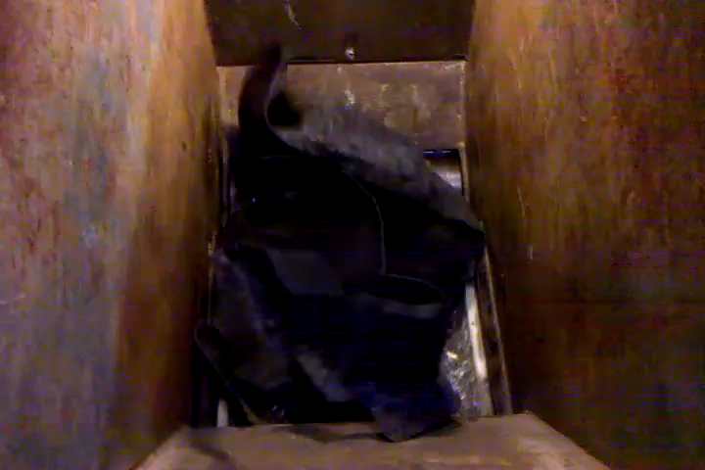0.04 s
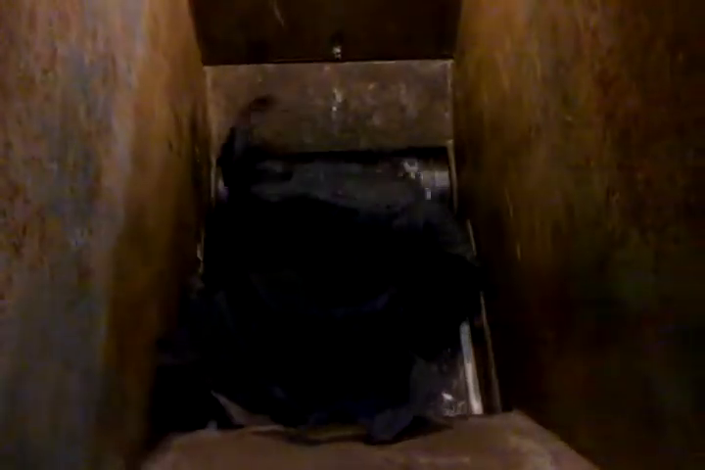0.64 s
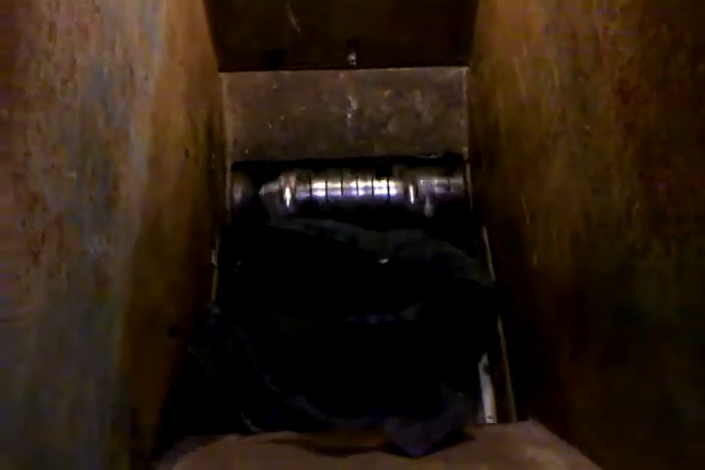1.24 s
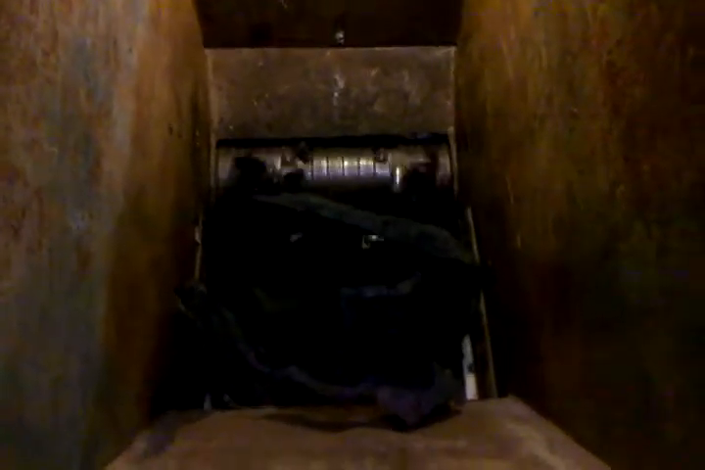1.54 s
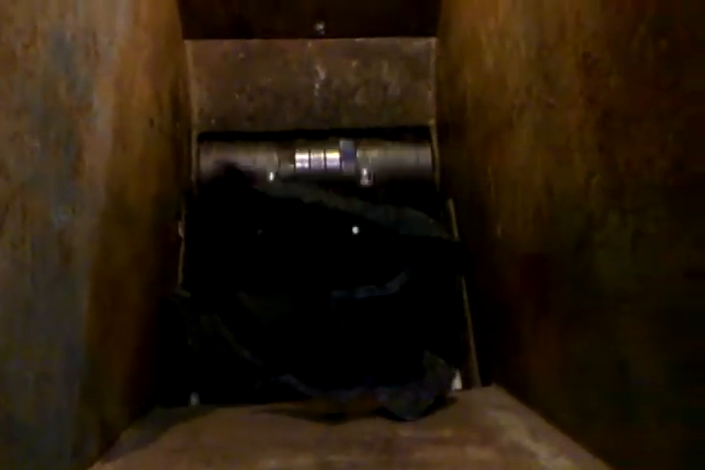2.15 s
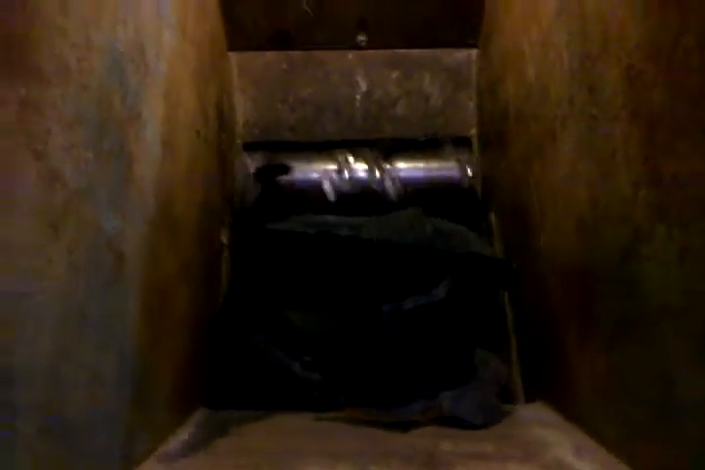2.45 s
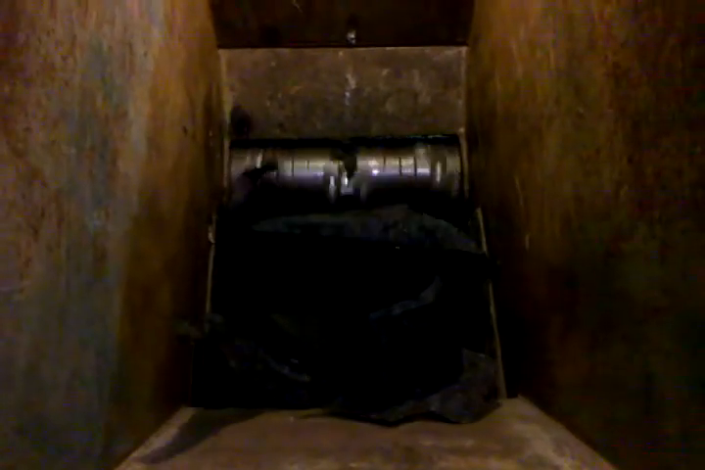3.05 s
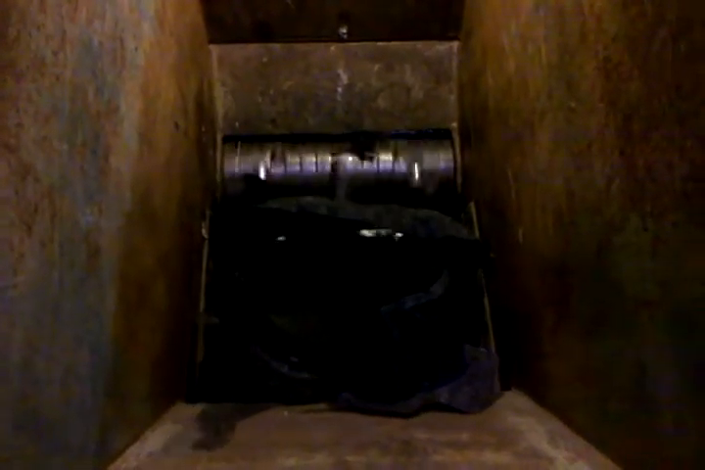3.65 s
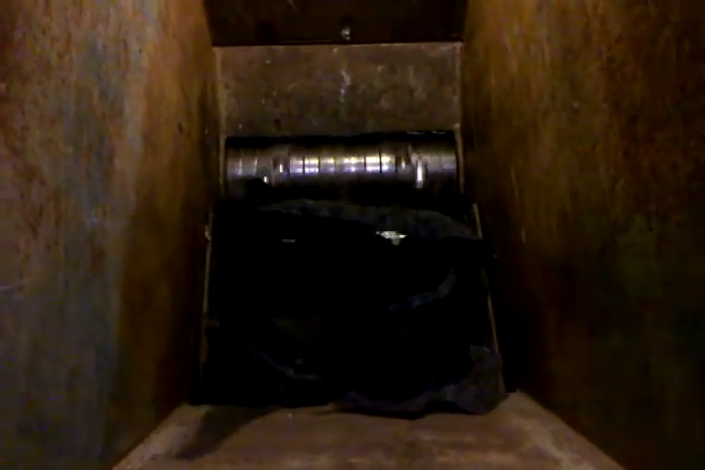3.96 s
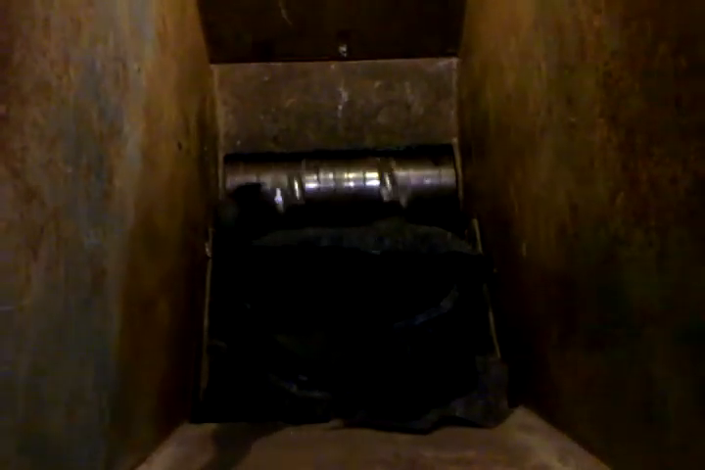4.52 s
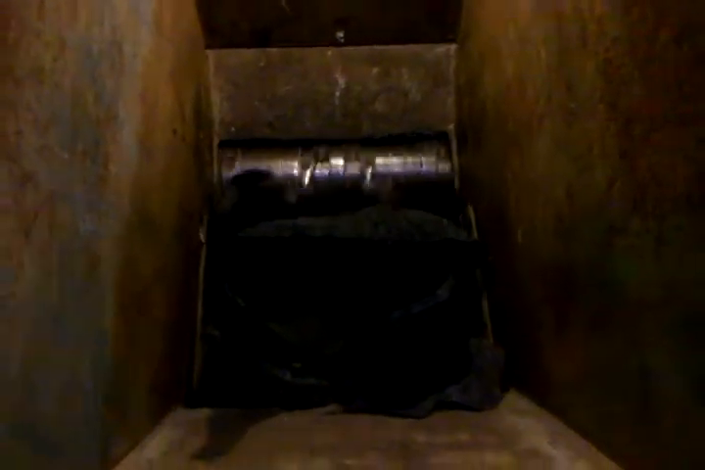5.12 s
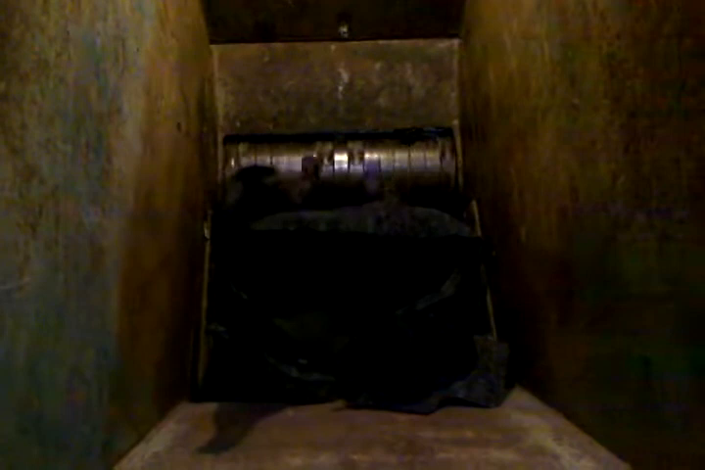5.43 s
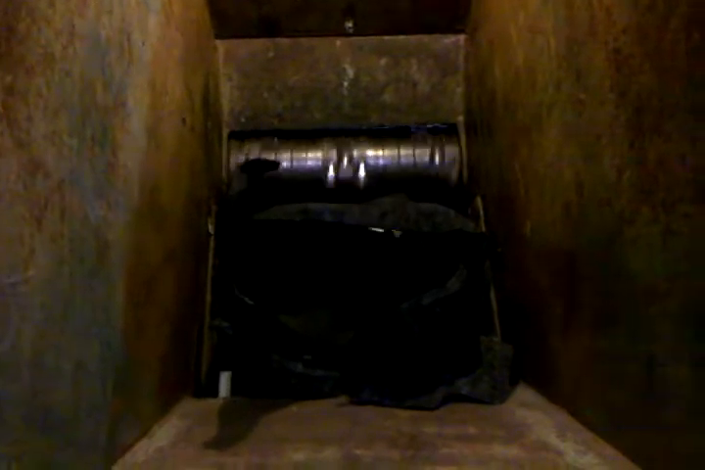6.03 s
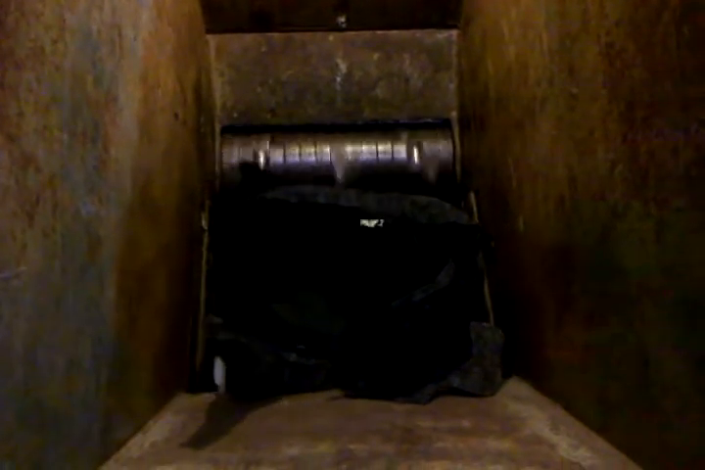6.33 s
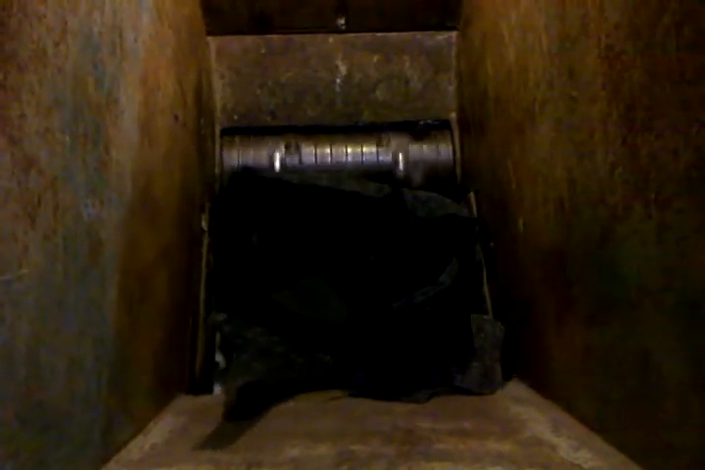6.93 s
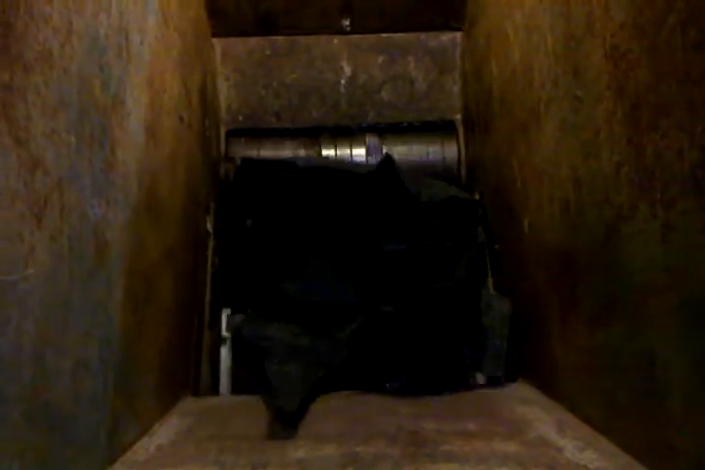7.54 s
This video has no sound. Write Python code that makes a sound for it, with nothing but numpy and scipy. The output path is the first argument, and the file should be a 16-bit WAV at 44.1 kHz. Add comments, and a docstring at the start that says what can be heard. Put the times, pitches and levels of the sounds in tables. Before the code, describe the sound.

After a brief silence, a running shredder cuts in, heard close up at the mouth of its steel hopper. Motor and gears drone in wavering, throbbing tones while the cutters grind with a dense rattle that makes the walls ring. Every so often the scrap sheet snaps sharply, buckles with a hollow knock, or thumps the walls and tears with a crunch. The cutting grows slightly brighter toward the end.

```python
"""A single-rotor shredder chews scrap sheet, heard close up on one small microphone at the hopper mouth.
After a short silence the sound cuts in. Down in the machine, motor and gears drone in wavering tones
while the cutters grind, a dense rattle that makes the steel hopper walls ring. Now and then the sheet
is caught, thumps the walls and tears with a crunch, snaps just below the microphone, or buckles."""
import sys
import numpy as np
from scipy import signal
from scipy.fft import rfft, irfft, next_fast_len
from scipy.io import wavfile

SR = 44100
rng = np.random.default_rng(int(sys.argv[2]) if len(sys.argv) > 2 else 0)


def wav_record(signal):
    """Record a signal, one row per channel, as 16-bit PCM in the file named by sys.argv[1]."""
    frames = np.transpose(np.atleast_2d(signal))
    bounded = np.clip(frames, -1, 1)
    # unit amplitude maps onto the largest positive 16-bit level
    quanta = np.round(bounded * 32767).astype(np.int16)
    wavfile.write(sys.argv[1], SR, quanta)


N = 343098
TIME = np.arange(N) / SR
START_S = 0.8134


def from_db(db):
    """Decibels to gain."""
    return 10 ** (np.asarray(db) / 20)


def unit_rms(x):
    """Scale to unit power."""
    return x / np.sqrt(np.mean(np.abs(x) ** 2) + 1e-20)


def drift(rate):
    """Smooth random wandering of spread 1."""
    step = 40   # samples
    pole = np.exp(-2 * np.pi * rate * step / SR)
    slow = signal.lfilter([1], [1, -2 * pole, pole * pole], rng.standard_normal(N // step + 2002))[2000:]
    return np.interp(np.arange(N) / step, np.arange(len(slow)), unit_rms(slow))


def band(x, low_hz, high_hz):
    """Causal band-pass."""
    sos = signal.butter(2, [low_hz, min(high_hz, .45 * SR)], "band", fs=SR, output="sos")
    return signal.sosfilt(sos, x)


def curves(rows):
    """One curve over time for each level column."""
    times, *columns = np.transpose(rows)
    return [np.interp(TIME, times, column) for column in columns]


def swings(rows):
    """How far each level column lies above or below its own mean."""
    return [curve - curve.mean() for curve in curves(rows)]


def place(x, s):
    """Start a short sound at s seconds."""
    return np.pad(x, (int(s * SR), N))[:N]


def tone(hz, wavering, rate):
    """The tone of a turning part; the wavering share of its power wanders in strength and phase."""
    phase = 2 * np.pi * (hz * TIME + rng.random())
    steady, unsteady = np.sqrt(2 * (1 - wavering)), np.sqrt(wavering)
    return (steady + unsteady * drift(rate)) * np.sin(phase) + unsteady * drift(rate) * np.cos(phase)


# Motor hum, sinking while the sheet is drawn in, then returning: t/s, level/dB
MOTOR_HUM = [(1.05, -30), (1.8, -31.5), (2.3, -46), (3.4, -53), (4.6, -49), (5.1, -35.5), (5.8, -28.5),
             (6.4, -29), (7.75, -39)]
# Three gear whines that surge and drop out: t/s, level/dB
LOW_GEAR = [(1.0, -39), (1.15, -31.5), (2.2, -34.5), (2.3, -47), (2.52, -27.5), (2.72, -31.5),
            (2.82, -25.5), (2.92, -30), (3.03, -29), (3.13, -32.5), (3.48, -27.5), (3.69, -31), (3.76, -39),
            (4.1, -29), (4.38, -31), (4.42, -44), (4.57, -30), (5.28, -36), (5.47, -29), (5.53, -46),
            (5.64, -24.5), (6.17, -34.5), (6.73, -24.5), (6.81, -53), (6.86, -31), (7.39, -32.5),
            (7.45, -24.5), (7.75, -34.5)]
MID_GEAR = [(0.98, -30.5), (1.1, -44), (1.3, -40.5), (2.1, -49), (2.4, -33), (2.7, -39.5), (3.3, -34),
            (3.5, -45), (3.7, -32), (3.85, -56), (3.95, -31), (4.15, -47), (4.95, -42), (5.15, -35),
            (5.65, -39.5), (6.2, -36), (6.55, -44.5), (7.7, -40)]
HIGH_GEAR = [(1.1, -39), (1.6, -49), (2.3, -44), (2.65, -45), (2.92, -33.5), (3.15, -35), (3.68, -46),
             (3.83, -35), (4.2, -45), (4.39, -30), (4.55, -52), (4.9, -31), (5.15, -48), (5.4, -32.5),
             (5.75, -48), (5.97, -36), (6.25, -37.5), (7.7, -46)]
# Two drones that trade places: t/s, low tone level/dB, high tone level/dB
GROAN_PAIR = [(1.0, -39, -34), (1.6, -32.5, -41), (2.2, -34.5, -32), (2.85, -44.5, -39.5), (3.1, -38, -33),
              (3.45, -53, -28.5), (3.8, -35.5, -37), (5.0, -42.5, -36.5), (6.5, -35, -37), (7.5, -33, -37)]
# Lesser tones behind them: f/Hz, level/dB, wavering share of power, wavering rate/Hz
DRIVE_TONES = [(84.8, -53.5, 0.97, 3.3), (101.8, -52, 0.6, 2.9), (205.6, -37.5, 0.7, 3.8),
               (276.6, -49, 0.9, 1.3), (507.5, -43, 0.93, 2.9), (534, -45.5, 0.6, 2.1),
               (560, -42.5, 0.7, 3.1), (965, -43.5, 0.6, 7.7), (1030, -44, 1, 5.5), (1123, -42, 0.6, 2.3),
               (1139, -44.5, .7, 3.3)]

def drive():
    """Motor and gears hum, whine and groan down in the machine."""
    hum = from_db(curves(MOTOR_HUM)[0]) * tone(hz=359.0, wavering=0.09, rate=14)
    whine = (from_db(curves(LOW_GEAR)[0]) * tone(hz=742.7, wavering=0.076, rate=7.9)
             + from_db(curves(MID_GEAR)[0]) * tone(hz=878.3, wavering=0.24, rate=6.6)
             + from_db(curves(HIGH_GEAR)[0]) * tone(hz=1291.5, wavering=0.25, rate=11))
    low, high = from_db(curves(GROAN_PAIR))
    groan = low * tone(hz=171.2, wavering=0.7, rate=4.8) + high * tone(hz=461.3, wavering=0.36, rate=8.8)
    drone = sum(from_db(db) * tone(hz, wavering, rate) for hz, db, wavering, rate in DRIVE_TONES)
    return hum + whine + groan + drone


def rattle(spectrum, per_s, spread_db, rush):
    """Countless small cuts of uneven size over a smooth rush, coloured by a spectrum."""
    sizes = from_db(spread_db * np.minimum(rng.exponential(1, N), 4)) * rng.choice([-1, 1], N)
    cuts = unit_rms(sizes * (rng.random(N) < per_s / SR))
    noise = unit_rms(cuts + rush * rng.standard_normal(N))
    size = next_fast_len(N)
    hz, db = np.transpose(spectrum)
    bins = np.maximum(np.fft.rfftfreq(size, 1 / SR), 1)
    colour = from_db(np.interp(np.log(bins), np.log(hz), db))
    return irfft(rfft(noise, size) * colour, size)[:N]


def flutter(x, t60, wet_db):
    """Reflections crowd between the steel walls and reach the microphone as a fine metallic ring."""
    age = TIME[:SR // 2]
    echoes = band(rng.standard_normal(len(age)), 1300, 8000) * from_db(-60 * age / t60)
    passband_gain = np.sqrt(np.sum(echoes ** 2) * SR / 2 / 7700)
    return x + from_db(wet_db) * signal.fftconvolve(x, echoes / passband_gain)[:N]


# Hopper walls, right beside the microphone: f/Hz, width/Hz, lift/dB
WALL_RESONANCES = [(81, 17, 5.5), (126.4, 15, 9.5), (180, 33, -4.5), (277, 28, 7.5), (457, 220, 3.5),
                   (651.5, 6.1, 5.5), (687, 12, 9.5), (756, 5.8, 13), (807, 9.3, 7.5), (937.5, 14, 11),
                   (1028, 20, 7.5), (1131.6, 44, 9), (1410, 14, 1.5), (1740, 57, 2), (2437, 12, 3.5),
                   (2592, 25, 6), (2780, 110, 4), (3490, 260, 2), (3980, 310, -1), (4530, 200, 2.5),
                   (5700, 250, 2.5)]

def hopper(x):
    """Each wall resonance lifts or dips its own narrow band and rings on."""
    for hz, width_hz, lift_db in WALL_RESONANCES:
        b, a = signal.iirpeak(hz, hz / width_hz, fs=SR)
        x = x + (from_db(lift_db) - 1) * signal.lfilter(b, a, x + 1e-18)
    return x


# How hard the rotor works, taken about its mean: t/s, level/dB
ROTOR_LOAD = [(1.0, -21), (1.12, -23), (1.28, -21.5), (1.45, -23), (1.88, -24.5), (2.35, -24.5),
              (2.7, -23.5), (3.33, -23), (3.77, -25.5), (4.63, -24), (4.8, -23), (5.2, -25), (5.81, -23.5),
              (6.05, -23), (7.35, -24), (7.7, -23.5)]
# Treble turning from hiss to cutting, each taken about its mean: t/s, cutting/dB, scraping/dB
CUT_AND_SCRAPE = [(1.05, -37, -43.5), (1.16, -36, -43.5), (1.88, -35.5, -43.5), (2.44, -32.5, -47.5),
                  (3.12, -32, -48), (3.88, -31.5, -47.5), (7.36, -29.5, -46.5), (7.7, -30, -46)]
# Brief swells and dips in the low rumble: t/s, lift/dB
RUMBLE_SWELLS = [(1.22, -3.5), (3.09, -1), (3.8, 3), (5.2, 4), (5.5, 5), (7.05, 3), (7.33, 2)]
# Spectra at the rotor, before the hopper: f/Hz, relative level/dB
RUMBLE_SPECTRUM = [(25, -45.5), (58, -37.5), (72, -11.5), (100, -10), (125, -6.5), (180, 7), (260, -1.5),
                   (350, -8), (600, -1.5), (1200, -59)]
GRIND_SPECTRUM = [(130, -33), (280, 0), (420, -0.5), (600, -4), (850, 1), (1300, -7.5), (1700, -5),
                  (3000, -34.5)]
CUT_SPECTRUM = [(800, -24), (1300, 4), (1600, -1), (1900, -1), (2400, -3), (3100, -9.5), (4200, -18.5),
                (7000, -48)]
SCRAPE_SPECTRUM = [(1500, -20.5), (2800, 6), (3600, 1.5), (4300, 3), (4800, 0), (5500, -3), (6300, -6.5),
                   (6850, -13), (7400, -16)]

def grinding():
    """The rotor rumbles, grinds, cuts and scrapes, louder under load, heard up through the hopper."""
    load_db, = swings(ROTOR_LOAD)
    cutting_db, scraping_db = swings(CUT_AND_SCRAPE)
    swell_db = sum(db * np.exp(-((TIME - s) / 0.067) ** 2) for s, db in RUMBLE_SWELLS)
    rumble = rattle(RUMBLE_SPECTRUM, per_s=900, spread_db=0.5, rush=1.3)
    grind = rattle(GRIND_SPECTRUM, per_s=2500, spread_db=2.5, rush=1.11)
    cut = rattle(CUT_SPECTRUM, per_s=2500, spread_db=2.5, rush=0.56)
    cut = flutter(cut, t60=0.59, wet_db=-3.0)
    scrape = rattle(SCRAPE_SPECTRUM, per_s=3000, spread_db=1.0, rush=0.89)
    scrape = flutter(scrape, t60=0.14, wet_db=-7.5)
    grab_db = drift(10)   # the cutters grab unevenly
    return (unit_rms(hopper(rumble)) * from_db(-31 + load_db + swell_db + 0.36 * grab_db)
            + unit_rms(hopper(grind)) * from_db(-29 + 0.81 * load_db + grab_db)
            + unit_rms(hopper(cut)) * from_db(-31.5 + cutting_db + 0.19 * load_db + grab_db)
            + unit_rms(hopper(scrape)) * from_db(-42 + scraping_db + 0.14 * load_db + 0.93 * grab_db))


# Thin gear and bearing tones: f/Hz, level/dB, wavering share of power, dB gained per dB of cutting
SINGING_TONES = [(1559, -45, .7, 1), (1662, -45.5, .7, 1), (1680, -48, .9, 1), (1844, -50, .9, 1),
                 (1868, -49, .9, 1), (1916, -50, .9, 1), (2031, -48.5, .7, .5), (2102, -53, .9, 1),
                 (2218, -52, .9, 1), (2403, -48, .5, 1.5), (2572, -51, .9, 0), (2606, -50.5, .8, .5),
                 (2741, -46.5, .65, 0), (2771, -47.5, .65, .3)]
# Sheet rubbing on the rotor: f/Hz, level at mean scraping/dB
SHEET_WHISTLES = [(3505, -63.5), (4043, -65.5), (4527, -65), (5012, -64.5), (5803, -65.5)]

def singing():
    """Gears sing louder with the cutting, bearings ring evenly, and the sheet whistles as it scrapes."""
    cutting_db, scraping_db = swings(CUT_AND_SCRAPE)
    gears = sum(from_db(db + follows * cutting_db) * tone(hz, wavering, rate=6.4)
                for hz, db, wavering, follows in SINGING_TONES)
    whistles = sum(from_db(db) * tone(hz, wavering=1.0, rate=12) for hz, db in SHEET_WHISTLES)
    return gears + from_db(1.4 * scraping_db) * whistles


# Strong throbs of the straining drive: t/s, level/dB
STRONG_THROBS = [(1.161, -24.5), (1.292, -22), (1.431, -25), (2.073, -27), (2.543, -27), (2.675, -27),
                 (3.14, -29.5), (3.8, -26), (4.297, -28.5), (4.404, -29), (4.512, -27.5), (4.65, -27.5),
                 (4.748, -25), (4.856, -26), (4.959, -26), (5.05, -28), (5.137, -27.5), (5.64, -24),
                 (5.791, -26.5), (6.007, -25), (6.449, -26), (6.783, -27.5), (6.994, -23.5), (7.443, -27.5)]

def throb(hz=550, half_length_s=0.033, per_s=10, weak_db=-29.5):
    """A gear tone comes in short swells, each a little off pitch; weak ones keep the beat in the gaps."""
    strong_scatter_hz, weak_scatter_hz = 3.1, 10
    throbs = [(s, db, strong_scatter_hz) for s, db in STRONG_THROBS]
    marks = [START_S] + [s for s, _ in STRONG_THROBS] + [N / SR]
    for start, end in zip(marks, marks[1:]):
        beats = np.linspace(start, end, round((end - start) * per_s) + 1)
        throbs += [(s, weak_db, weak_scatter_hz) for s in beats[1:-1]]
    chance = rng.standard_normal((200, 3))
    out = np.zeros(N)
    for (s, db, scatter_hz), (stray_db, detune, phase) in zip(throbs, chance):
        near = slice(*np.searchsorted(TIME, [s - np.pi * half_length_s, s + np.pi * half_length_s]))
        age = TIME[near] - s
        swell = np.sqrt(2) * from_db(db + stray_db) * np.exp(-(age / half_length_s) ** 2)
        out[near] += swell * np.sin(2 * np.pi * ((hz + scatter_hz * detune) * age + phase))
    return out


def burst(s, t60, low_hz, high_hz):
    """A cluster of fractures that dies away, of about unit strength at its start."""
    age = TIME[:SR // 2]
    noise = band(rng.standard_normal(len(age) + SR // 10), low_hz, high_hz)[-len(age):]
    envelope = from_db(-60 * age / t60) * (1 - np.exp(-age / .00015))
    return place(unit_rms(noise * envelope) * np.sqrt(np.mean(envelope ** 2)), s)


def crack(s, low_hz, high_hz):
    """One clean impact of unit height."""
    pulse = band(signal.unit_impulse(SR // 50), low_hz, high_hz)
    return place(pulse / np.abs(pulse).max(), s)


# Steel frame and rotor under a heavy blow: f/Hz, relative level/dB, t60/s
STEEL_MODES = [(130.2, 1, 0.48), (254, 0, 0.36), (285.6, -9, 0.18), (313, -3, 0.21), (340, -8, 0.052),
               (402, -4, 0.2), (476, -3, 0.27), (656, 2.5, 0.27), (690, -7, 0.17), (950, 2, 0.47),
               (1090, -15.5, 0.23), (1340, -11.5, 0.23), (1406, 2, .1), (1663, -4.5, .31), (1990, 1, 0.17),
               (2205, -2.5, 0.3), (2473, -5.5, 0.4), (2700, 0, 0.12), (2800, -5.5, 0.38), (3000, -8, 0.24),
               (3670, 0.5, 0.44), (3840, 0, 0.45)]

def clang(s, centre_hz, octaves=0.26, chatter_s=.00005):
    """A blow wakes the steel's modes near centre_hz; the sheet chatters on it and roughens the ring."""
    age = TIME[:SR // 2]
    hz, db, t60 = np.transpose(STEEL_MODES)[:, :, None]
    reach = np.exp(-.5 * (np.log2(hz / centre_hz) / octaves) ** 2)
    wander = drift(67)
    chatter = np.array([wander[i:i + len(age)] for i in rng.integers(0, N - len(age), len(hz))])
    phase = 2 * np.pi * (hz * (age + chatter_s * chatter) + rng.random(hz.shape))
    rings = reach * from_db(db - 60 * age / t60) * np.sin(phase)
    contact = 1 - np.exp(-(age * centre_hz / 0.9) ** 2)   # the push lasts a cycle or two
    return place(rings.sum(axis=0) * contact, s)


# Cutters biting the sheet down in the hopper, levels relative:
# t/s, thump level/dB, thump t60/s, tear level/dB, tear f/Hz, tear t60/s, ring level/dB, ring f/Hz
CUTTER_BITES = [(0.956, -41, 0.27, -38, 1050, 0.42, -32, 980), (2.848, -28, 0.088, -27, 1470, .3, -20, 315),
                (2.867, -25, 0.23, -21, 1580, 0.37, -29, 1150),
                (2.984, -20.5, 0.27, -30, 940, 0.31, -25, 443),
                (3.274, -22.5, 0.075, -21, 2200, 0.071, -20, 400),
                (3.281, -17.5, 0.093, -22, 1510, 0.041, -23, 417),
                (4.744, -34, 0.17, -25, 1500, 0.1, -26.5, 127),
                (4.764, -13.5, 0.079, -17, 1510, 0.06, -17.5, 1300),
                (4.772, -17.5, .035, -20, 1500, .04, -20.5, 240),
                (4.783, -23, 0.49, -22, 1590, 0.49, -15.5, 750),
                (4.835, -21, 0.22, -32, 1710, 0.28, -29, 950),
                (5.439, -36, .3, -25.5, 1730, 0.42, -40, 1900),
                (5.471, -27, 0.2, -30, 1940, 0.21, -26.5, 1970),
                (5.889, -30, 0.44, -20.5, 1610, 0.52, -31, 1600),
                (6.408, -22, 0.14, -25, 1300, 0.28, -27, 596),
                (6.626, -57, 0.11, -24.5, 2550, 0.15, -24.5, 2570),
                (6.641, -52, .1, -26, 2550, 0.19, -24, 2650),
                (7.164, -26, 0.32, -21, 1910, 0.42, -19.5, 2860),
                (7.303, -20, 0.13, -26, 2600, 0.18, -24.5, 256)]

def bites():
    """A caught sheet knocks, thumps the walls, rips, and leaves the steel ringing."""
    noise, rings = 0, 0
    for s, thump_db, thump_t60, tear_db, tear_hz, tear_t60, ring_db, ring_hz in CUTTER_BITES:
        noise += from_db(thump_db) * (burst(s, thump_t60, 170, 500) + crack(s, 300, 3000))
        noise += from_db(tear_db) * burst(s, tear_t60, tear_hz / 1.38, tear_hz * 1.3)
        rings += from_db(ring_db) * clang(s, ring_hz)
    return from_db(-3.5) * hopper(noise) + rings


# Brittle breaks just under the hopper mouth: t/s, level/dB, f/Hz, t60/s
SHEET_SNAPS = [(1.6206, -36, 5970, 0.018), (1.6956, -35, 5400, .025), (1.7724, -22.5, 6000, .006),
               (1.7729, -24, 4400, .006), (2.011, -44, 6000, 0.46), (2.2123, -21.5, 3380, 0.018),
               (2.2233, -29, 5200, .014), (2.223, -27, 3400, .04), (2.2981, -4, 5230, 0.0015),
               (2.2983, -16, 3340, 0.0033), (2.864, -40, 5870, 0.083), (2.868, -33, 3400, 0.078),
               (2.9857, -27, 3700, .024), (3.2732, -25, 5900, 0.013), (3.2736, -17, 3300, 0.012),
               (3.2753, -23, 4400, 0.0063), (3.2760, -26, 5770, .008), (3.2812, -22, 3300, 0.011),
               (3.2815, -34, 6200, .008), (3.3245, -42, 6000, 0.043), (3.382, -39, 6450, .006),
               (3.689, -17.5, 3500, 0.0098), (3.69, -27, 6330, .004), (4.3335, -39, 4800, .03),
               (4.765, -24, 2610, .025), (4.767, -26, 3680, .022), (4.769, -35, 6130, 0.014),
               (4.774, -20, 3100, .02), (4.775, -34, 5200, .012), (4.785, -33, 3440, 0.2),
               (4.786, -46, 5600, 0.25), (5.3910, -23, 3280, .03), (5.413, -30, 4060, .015),
               (5.572, -36, 4200, 0.13), (5.9323, -36, 5300, 0.033), (6.1091, -33, 4020, 0.046),
               (6.2263, -33.5, 4020, 0.081), (6.4092, -23, 3430, 0.011), (6.453, -35, 5240, .03),
               (6.584, -32, 4900, 0.015), (6.585, -40, 6500, .016), (6.625, -34, 3750, 0.12),
               (6.627, -40, 5340, 0.2), (6.946, -31.5, 4200, 0.022), (7.163, -35, 5460, 0.23),
               (7.164, -17, 4140, 0.05), (7.165, -24, 2180, .03), (7.181, -29.5, 3900, 0.31),
               (7.302, -44, 6260, 0.12), (7.638, -22, 3550, 0.013)]

def snaps():
    """The sheet breaks close to the microphone: one fracture, splinters, a faint ring of the walls."""
    out = 0
    for s, db, hz, t60 in SHEET_SNAPS:
        fracture = from_db(-8.5) * crack(s, hz / 4.9, hz * 4.3)
        splinters = burst(s + .0003, t60, hz / 1.16, hz * 1.065)
        out += from_db(db) * (fracture + splinters)
    return flutter(out, t60=0.12, wet_db=-16)


# Short hollow knocks of the sheet: t/s, level/dB, f/Hz, t60/s
SHEET_BUCKLES = [(2.852, -8.5, 294, 0.084), (3.283, -17, 335, 0.059)]

def buckles(overtone_ratio=1.27, overtone_db=-4, rise_s=0.0037):
    """A bent sheet gives way and sounds two low, quickly damped modes."""
    out = 0
    for s, db, hz, t60 in SHEET_BUCKLES:
        age = np.clip(TIME - s, 0, 1)
        phase = 2 * np.pi * hz * age
        overtone = from_db(overtone_db) * np.sin(overtone_ratio * phase + 2 * np.pi * rng.random())
        envelope = from_db(db - 60 * age / t60) * (1 - np.exp(-age / rise_s))
        out += (np.sin(phase) + overtone) * envelope
    return out


def scene():
    """The whole machine from the hopper mouth, in mono."""
    return (drive() + throb() + singing() + grinding() + snaps() + bites() + buckles())[None, :]


def record(dry):
    """The sound cuts in and swells; the small microphone loses the deep bass; the top is cut steeply."""
    start_db, swell_s, low_hz, high_hz = -12.5, 0.2, 62, 6950
    swell = from_db(start_db * np.clip(1 - (TIME - START_S) / swell_s, 0, 1))
    opened = dry * (TIME >= START_S) * swell
    thinned = signal.sosfilt(signal.butter(4, low_hz, "high", fs=SR, output="sos"), opened)
    return signal.sosfilt(signal.cheby1(10, .3, high_hz, fs=SR, output="sos"), thinned)


dry = scene()
out = record(dry)
wav_record(out)
```